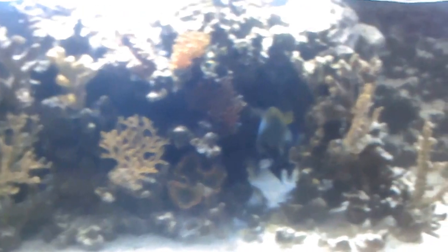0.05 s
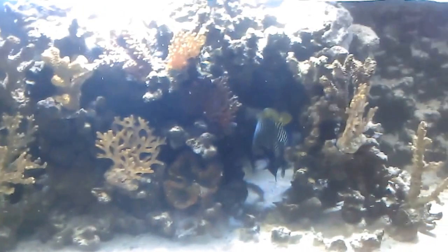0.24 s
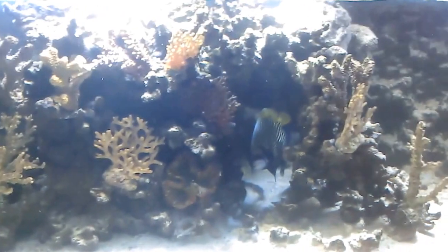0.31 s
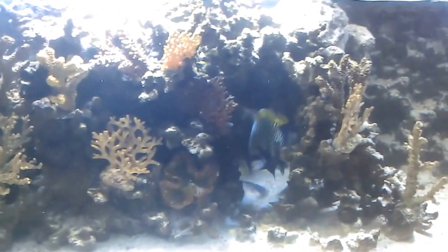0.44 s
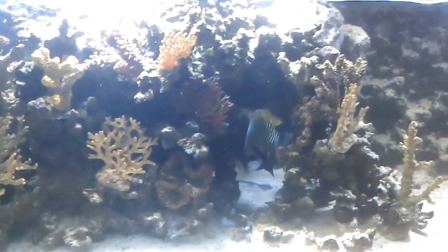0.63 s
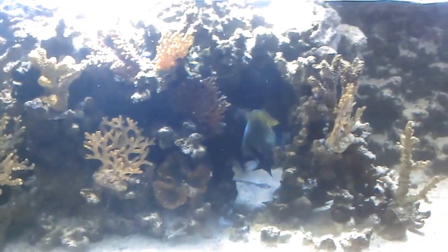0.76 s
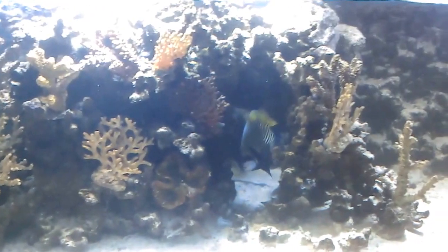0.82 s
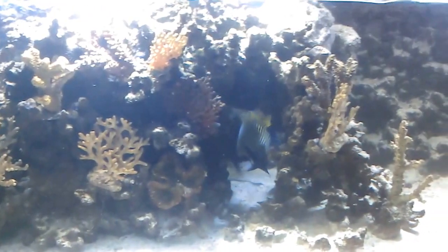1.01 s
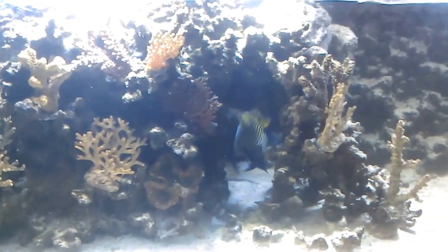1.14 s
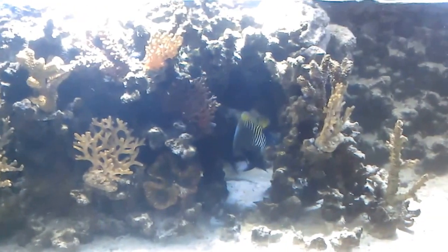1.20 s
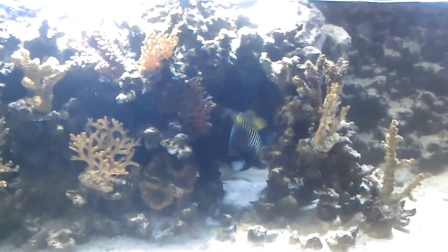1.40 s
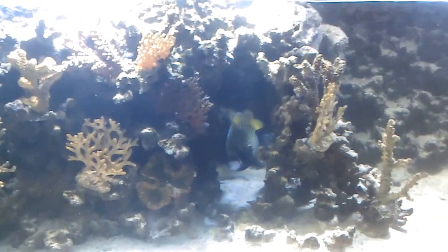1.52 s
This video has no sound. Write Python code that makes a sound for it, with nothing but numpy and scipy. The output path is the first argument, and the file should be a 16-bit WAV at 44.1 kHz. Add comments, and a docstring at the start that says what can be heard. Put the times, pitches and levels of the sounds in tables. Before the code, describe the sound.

A single sharp snap over the faint hum and hiss of aquarium pumps.

```python
"""From the start, a reef tank's pumps hum and rumble under a steady hiss.
At 0.22 s comes one sharp snap: a hard tick and four quick, fading rebounds that ring for an instant.
Nearby glass and the cabinet scatter it into a very short tail.
From about 0.6 s the rumble bumps softly four times, while the hum and hiss carry on to the end.
All of it is heard through a small recorder that loses the highest treble."""
import sys
import numpy as np
from scipy import signal
from scipy.fft import rfft, irfft
from scipy.io import wavfile

SR = 44100
rng = np.random.default_rng(int(sys.argv[2]) if len(sys.argv) > 2 else 0)


def output_pcm(signal):
    """Save a mono or channel-first signal as 16-bit PCM at the path in sys.argv[1].

    Samples are clipped to [-1, 1] before scaling.
    """
    pcm = np.clip(np.atleast_2d(signal).T, -1, 1) * 32767
    wavfile.write(sys.argv[1], SR, np.round(pcm).astype(np.int16))


N = 68355

# when the tick and each rebound land: t/s
TICK_TIMES = [.22042, .22446, .22768, .2304, .2325]
# how strong each one is: level/dB, extra bass/dB, extra treble/dB
TICK_LEVELS = [(0, 0, 0), (-5.5, 2, -10), (-14, 1, 1), (-26, 10, -3), (-26, 0, 0)]
# where the extra bass starts and ends its fade, then the extra treble its rise: f/Hz
TONE_CORNERS = [1000, 3500, 6000, 8000]
# the tone of a bare tick: f/Hz, level/dB
TICK_TONE = [(40, -18), (130, -12), (230, -6), (450, -2), (800, -3), (1300, -6), (1700, -2), (2100, -7),
             (2550, -3.5), (3050, -10), (3500, 2), (4100, 10), (4900, 8.5), (5400, -3), (6100, 10),
             (7300, 9), (9000, 6)]
# the notes the snapping part rings at: f/Hz, level/dB, time to fade by 60 dB/s
RING_NOTES = [(236, -51, .045), (980, -49, .024), (4230, -38, .009), (5250, -51, .04), (7800, -11, .0035)]
def snap(size=4096):
    """A part hits and rebounds; each hit is a sharp pulse that rings the same few short notes."""
    hz, t, out = np.fft.rfftfreq(size, 1 / SR), np.arange(size) / SR, np.zeros(N)
    ring = sum(amp(db) * 1e-3 ** (t / fade_s) * np.cos(2 * np.pi * f * t)
               for f, db, fade_s in RING_NOTES)
    tick = pulse(read_curve(TICK_TONE, hz)) + ring
    for start_s, (db, bass_db, treble_db) in zip(TICK_TIMES, TICK_LEVELS):
        tone_db = np.interp(hz, TONE_CORNERS, [bass_db, 0, 0, treble_db])
        add(out, start_s, signal.fftconvolve(tick, pulse(db + tone_db)))
    return out


# the tone of the sound that bounces back: f/Hz, level/dB
ECHO_TONE = [(100, -15), (900, -8), (1500, -14), (3000, -14), (4500, -14), (7500, -14)]
def close_echoes(sound, size=4096, rise_s=0.0011, fade_s=0.016):
    """Nearby glass and the cabinet scatter the sound into a very short tail."""
    t = np.arange(size) / SR
    rise = 1 - np.exp(-(t / rise_s) ** 2)
    tail = rng.standard_normal(size) * rise * 1e-3 ** (t / fade_s)
    tone = pulse(read_curve(ECHO_TONE, np.fft.rfftfreq(size, 1 / SR)))
    echo = signal.fftconvolve(tail / np.linalg.norm(tail), tone)
    return signal.fftconvolve(sound, echo)[:N]


# the notes in the pumps' hum: f/Hz, average level/dB, wavering speed/Hz
HUM_NOTES = [(48, -63.5, 12), (86.7, -66, 10), (200.6, -76.5, 5), (346, -68.5, 4.9), (398, -71, 4.7),
             (518, -77, 3.1), (560, -83, 5.4), (791, -80.5, 7)]
def pump_hum(waver=0.87):
    """The pumps hum on several low notes, each wavering on its own."""
    t, hum = np.arange(N) / SR, np.zeros(N)
    for hz, db, waver_hz in HUM_NOTES:
        wobble = 1 + waver * drift(waver_hz)
        note = np.exp(2j * np.pi * (hz * t + rng.random()))
        hum += amp(db) * unit_level((wobble * note).real)
    return hum


# the tone of the rumble: f/Hz, level/dB in each 1 Hz band
RUMBLE_TONE = [(8, -78), (22, -82.5), (45, -86), (66, -88), (95, -83.5), (125, -86.5), (230, -87),
               (390, -85.5), (450, -90.5), (570, -90), (680, -96), (850, -96), (1300, -105), (3000, -120)]
def pump_rumble(swell_db=1.5, swell_hz=6):
    """The pumps make a deep noise that gently swells and sinks."""
    return noise(RUMBLE_TONE) * amp(swell_db * unit_level(drift(swell_hz).real))


# the middle of each bump in the rumble: t/s, level/dB
BUMPS = [(.58, -54), (.895, -57), (1.09, -49), (1.34, -49)]
def soft_bumps(hz=40, width_s=0.012):
    """Now and then the rumble bumps: a deep tone comes and goes in a cycle or two."""
    t = np.arange(N) / SR
    return sum(amp(db) * np.exp(-((t - s) / width_s) ** 2) * np.sin(2 * np.pi * hz * (t - s))
               for s, db in BUMPS)


# the tone of the hiss: f/Hz, level/dB in each 1 Hz band
HISS_TONE = [(100, -103), (2500, -102), (4300, -101.5), (5800, -100), (6600, -97.5), (7800, -99.5)]
def air_hiss():
    """A faint, steady hiss fills the air."""
    return noise(HISS_TONE)


def amp(db):
    """Turns decibels into a number to multiply by."""
    return 10 ** (np.asarray(db) / 20)


def read_curve(points, hz):
    """Reads levels between a table's rows, with frequency spaced like musical pitch."""
    f, db = np.transpose(points)
    return np.interp(np.log(hz + 1), np.log(f + 1), db)


def unit_level(x):
    """Scales a sound to an average (rms) level of 1."""
    return x / np.sqrt(np.mean(abs(x) ** 2) + 1e-20)


def noise(tone):
    """Steady noise shaped by a tone table."""
    white = rng.standard_normal(N) * np.sqrt(SR / 2)
    gain = amp(read_curve(tone, np.fft.rfftfreq(N, 1 / SR)))
    return irfft(rfft(white) * gain, N)


def pulse(db):
    """The shortest pulse that has these levels from 0 Hz to half the sample rate."""
    log_gain = np.log(amp(np.r_[db, db[-2:0:-1]]))
    return np.fft.ifft(np.exp(np.conj(signal.hilbert(log_gain)))).real


def drift(hz):
    """A slow random wander up to about this speed, in complex numbers (size and phase)."""
    f = np.fft.fftfreq(2 * N, 1 / SR)
    white = rng.standard_normal(2 * N) + 1j * rng.standard_normal(2 * N)
    slow = np.fft.ifft(np.fft.fft(white) * np.exp(-(f / hz) ** 2))
    return unit_level(slow[:N])


def add(mix, start_s, sound):
    """Places a sound in the mix."""
    part = mix[round(start_s * SR):][:len(sound)]
    part += sound[:len(part)]


def scene():
    """The snap and its echoes over the pumps and the hiss, in one channel."""
    click = snap()
    return (click + close_echoes(click) + pump_hum() + pump_rumble() + soft_bumps() + air_hiss())[None]


def record(dry, cutoff_hz=8120):
    """A small recorder loses the treble above its cutoff."""
    treble_cut = signal.firwin(201, cutoff_hz, window=("kaiser", 7), fs=SR)
    return signal.oaconvolve(dry, treble_cut[None], "same")


dry = scene()
out = record(dry)
output_pcm(out)
```